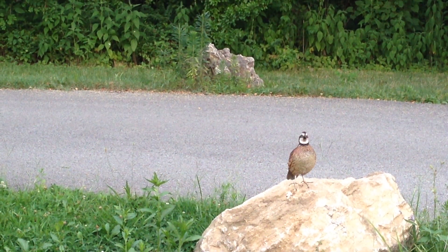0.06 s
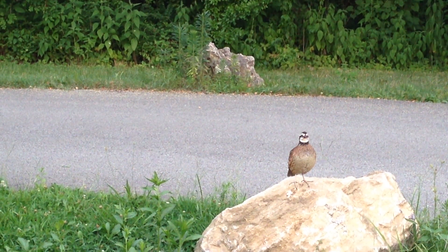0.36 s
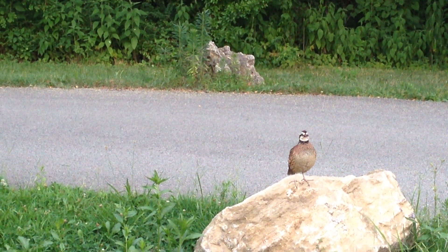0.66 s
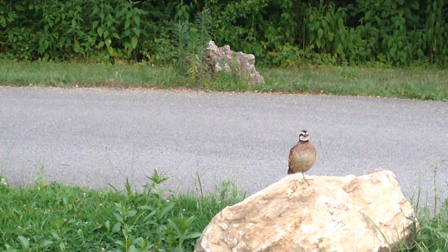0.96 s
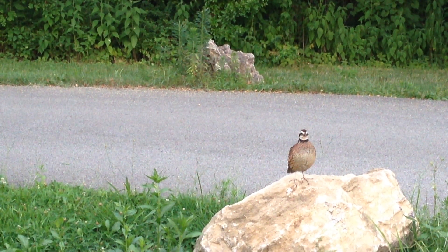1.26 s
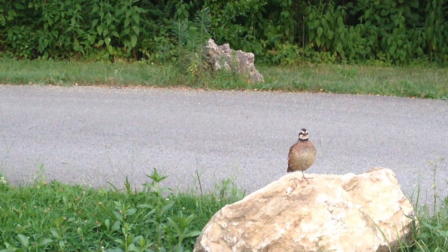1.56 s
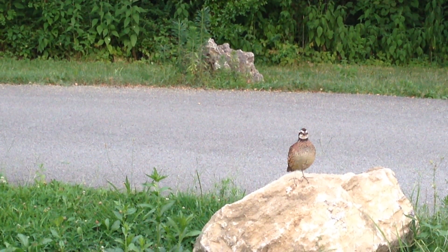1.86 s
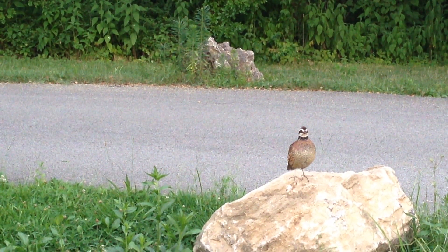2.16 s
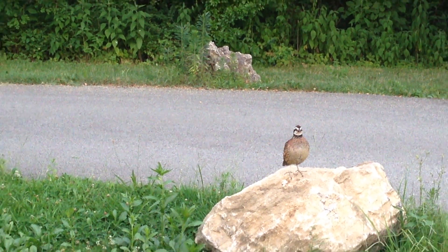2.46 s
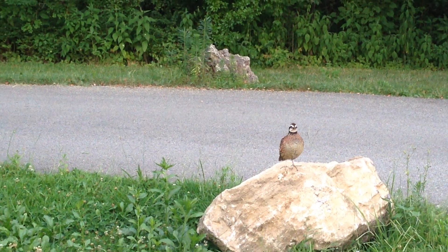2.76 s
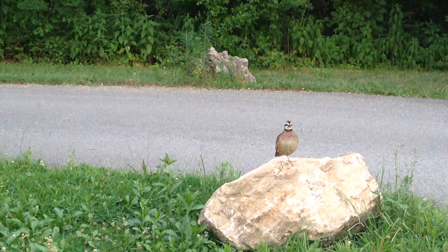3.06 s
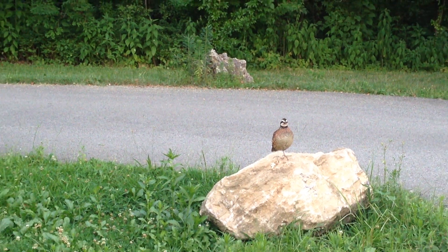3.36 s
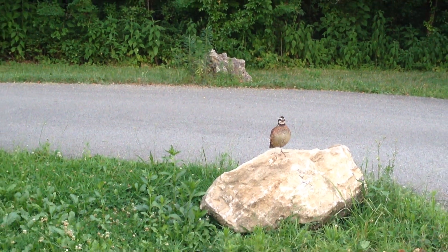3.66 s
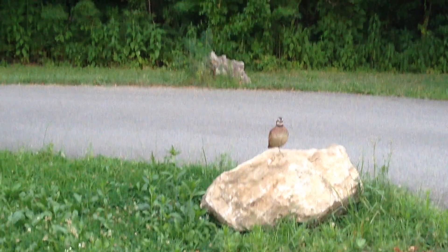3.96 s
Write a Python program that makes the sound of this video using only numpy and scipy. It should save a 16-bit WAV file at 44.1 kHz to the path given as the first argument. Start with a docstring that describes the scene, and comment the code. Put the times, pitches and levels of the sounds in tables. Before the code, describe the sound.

A quail close by gives one loud rising whistle right at the start, buzzing in the middle and cracking into a brief hoarse falling note by 0.2 seconds. Its echo fades through the woods by about 1 second. Faint outdoor air and a barely audible distant insect remain. A small tick comes near 2.9 seconds and a soft low microphone bump near 3.4 seconds.

```python
"""A quail on a rock, close to the microphone, gives one loud rising whistle beside a quiet country road.
A second, slower vibration makes the middle of the whistle buzz; at the top the voice cracks into a
hoarse falling note. Nearby ground and leaves scatter the call, and the wood across the road echoes it.
Around it lie still air and a faint, distant insect; later come a tick and a soft bump on the camera."""
import sys
import numpy as np
from scipy import signal
from scipy.fft import rfft, irfft
from scipy.io import wavfile
from scipy.ndimage import uniform_filter1d

SR = 44100
rng = np.random.default_rng(int(sys.argv[2]) if len(sys.argv) > 2 else 0)


def master_out(mix):
    """Clip the mix to full scale and print it as 16-bit PCM to the path in sys.argv[1]."""
    frames = np.transpose(np.atleast_2d(mix))
    ceiling = np.clip(frames, -1, 1)
    pcm = np.round(ceiling * 32767).astype(np.int16)
    wavfile.write(sys.argv[1], SR, pcm)


N = 176400


def amp(db):
    """Decibels to gain."""
    return 10 ** (np.asarray(db) / 20)


def unit(x):
    """Scales to rms 1."""
    return x / np.sqrt(np.mean(x ** 2) + 1e-20)


def follow(table, t):
    """The columns of a control table at times t."""
    times, *columns = np.transpose(table)
    return [np.interp(t, times, c) for c in columns]


def read(points, hz):
    """Interpolates a table on a log-frequency axis."""
    f, value = np.transpose(points)
    return np.interp(np.log(hz + 1), np.log(f), value)


def coloured(x, points):
    """Filters x by a spectrum table."""
    return irfft(rfft(x) * amp(read(points, np.fft.rfftfreq(len(x), 1 / SR))), len(x))


def noise(colour, size):
    """Noise of rms 1, its spectrum shaped by colour(hz)."""
    return unit(irfft(rfft(rng.standard_normal(size)) * colour(np.fft.rfftfreq(size, 1 / SR)), size))


def wander(rate_hz, size):
    """Random drift, mostly slower than rate_hz."""
    return noise(lambda f: 1 / (1 + (f / rate_hz) ** 4), size)


def gate(t, start, end, fade):
    """Opens at start and closes at end, with smooth edges."""
    return np.sin(np.pi / 2 * np.clip(np.minimum(t - start, end - t) / fade, 0, 1)) ** 2


# Still air at the roadside, with microphone hiss. Each row: frequency in Hz, relative level in dB.
AIR_SPECTRUM = [(12, -54.5), (20, -24.5), (39, -8), (59, -2.5), (112, -0.5), (139, -5), (184, 0), (243, -6),
                (279, -11.5), (485, -14.5), (589, -15.5), (736, -16.5), (1430, -24), (5270, -20.5),
                (6400, -20.5), (7150, -23), (15100, -24)]


def air(level_db=-64, patchy_db=.9):
    """Low outdoor rumble and smooth hiss, slightly patchy in time and frequency."""
    hz, _, bands = signal.stft(rng.standard_normal(N), SR, nperseg=4096, noverlap=3072)
    patches = unit(uniform_filter1d(uniform_filter1d(rng.standard_normal(bands.shape), 12, 0), 5, 1))
    bands = bands * amp(read(AIR_SPECTRUM, hz)[:, None] + patchy_db * patches)
    return amp(level_db) * unit(signal.istft(bands, SR, nperseg=4096, noverlap=3072)[1][:N])


# An insect far from the microphone. Each row: start in seconds, length in seconds, level in dB.
INSECT_PHRASES = [(0.302, 0.41, -84), (1.2, .5, -79.5), (2.33, .52, -77), (3.3, .55, -78.5)]


def insect(t, centre_hz=6330, half_width_hz=220, fade_s=.092):
    """A narrow, far-off sizzle in slow phrases."""
    sizzle = noise(lambda f: 1 / (1 + ((f - centre_hz) / half_width_hz) ** 2), N)
    return sizzle * sum(amp(db) * gate(t, s, s + length, fade_s) for s, length, db in INSECT_PHRASES)


# A double tick on the camera body, right at the microphone. Each row: delay in seconds, strength in dB.
CAMERA_TICKS = [(0, -35.5), (.00172, -35)]


def camera_tick(t, start_s=2.862):
    """The camera body rings and dies at once, twice over, with a bright snap on the first tick."""
    def ring(onset_s, db, hz, decay_s):
        age = np.maximum(t - onset_s, 0)
        return amp(db) * np.exp(-age / decay_s) * np.sin(2 * np.pi * hz * age)
    ticks = sum(ring(start_s + delay, db, hz=720, decay_s=.0004) for delay, db in CAMERA_TICKS)
    snap = ring(start_s, db=-44, hz=3400, decay_s=.00026)
    return signal.sosfilt(signal.butter(2, 240, "highpass", fs=SR, output="sos"), ticks + snap)


def camera_bump(t, peak_s=3.423, hz=85.1, width_s=.009, peak_db=-50.5):
    """A soft bump on the camera reaches the microphone as one low pulse."""
    offset = t - peak_s
    return amp(peak_db) * np.exp(-(offset / width_s) ** 2) * np.cos(2 * np.pi * hz * offset)


def echo(x, t60, colour, delay_s, build_s):
    """Scattered sound: a tail that builds up, each band dying at its own speed."""
    hz, t, bands = signal.stft(rng.standard_normal(2 * SR), SR, nperseg=512)
    decay = amp(read(colour, hz)[:, None] - 60 * t / read(t60, hz)[:, None])
    bands = bands * decay * (1 - np.exp(-t / build_s))
    tail = np.r_[np.zeros(int(delay_s * SR)), signal.istft(bands, SR, nperseg=512)[1]]
    f = np.fft.rfftfreq(len(tail), 1 / SR)
    voice_band = (f > 1600) & (f < 2700)
    voice_gain = np.sqrt(np.mean(abs(rfft(tail)[voice_band]) ** 2))
    return signal.fftconvolve(x, tail / voice_gain)[:N]


# How long the place rings: close by, at the wood's edge across the road, and deeper in the wood.
# Each row: frequency in Hz, time to fall 60 dB in seconds.
NEAR_DECAY = [(500, 0.05), (1200, 0.38), (2200, 0.2), (4000, 0.36), (7000, 0.35), (14000, 0.2)]
WOOD_EDGE_DECAY = [(500, 0.07), (2000, 0.31), (8000, 0.55)]
DEEP_WOOD_DECAY = [(500, .6), (1200, 0.851), (1720, 1.7), (2100, 1.1), (2500, 1.2), (3200, .65), (7000, .5),
                   (14000, .3)]
# The same three echoes' colour at the microphone. Each row: frequency in Hz, relative gain in dB.
NEAR_SPECTRUM = [(500, -10), (1200, -5.5), (1800, 0), (2100, -3), (2600, 2), (3300, 0), (4000, -3.5),
                 (7000, -3), (14000, -6.5)]
WOOD_EDGE_SPECTRUM = [(500, -12), (1300, -6), (1780, 3), (2100, -5), (2550, 5.5), (2900, -10),
                      (7000, -12.5), (14000, -20)]
DEEP_WOOD_SPECTRUM = [(500, -12), (1350, -11), (1680, 8), (1850, -0.5), (2080, -8), (2520, 6), (2850, -11),
                      (4000, -8), (7000, -9.5), (14000, -15.5)]


def surroundings(call):
    """Ground and leaves nearby answer first; then the wood's edge slaps back and the wood rings on."""
    near = amp(-22) * echo(call, NEAR_DECAY, NEAR_SPECTRUM, delay_s=.006, build_s=.02)
    slap = amp(-25) * echo(call, WOOD_EDGE_DECAY, WOOD_EDGE_SPECTRUM, delay_s=.098, build_s=.006)
    far = amp(-30.5) * echo(call, DEEP_WOOD_DECAY, DEEP_WOOD_SPECTRUM, delay_s=.1, build_s=.025)
    return near + slap + far


# The break in the bird's voice, from close by. Each row: frequency in Hz, relative level in dB.
CRACK_SPECTRUM = [(700, -70), (1400, -26), (2200, -6), (3000, 0), (3700, -13), (5000, -16), (7000, -15),
                  (10000, -21), (14000, -29)]


def voice_crack(t, peak_s=.14, width_s=.0024, level_db=-28):
    """The voice breaks at the top of the whistle in a brief burst of noise."""
    burst = noise(lambda f: amp(read(CRACK_SPECTRUM, f)), len(t))
    return burst * amp(level_db) * np.exp(-((t - peak_s) / width_s) ** 2)


# The note after the break. Each row: time in seconds, pitch in Hz, level in dB before colouring.
FALL_CONTOUR = [(.149, 1450, -44), (.154, 1405, -20), (.16, 1299, -26.5), (.167, 1123, -27),
                (.176, 985, -25), (.186, 860, -33.5), (.194, 730, -36), (.203, 670, -43), (.215, 640, -54)]
# Its colour at the microphone: throat resonances with dips from the ground reflection.
# Each row: frequency in Hz, gain in dB.
FALL_COLOUR = [(300, -75), (540, -42), (660, -9), (900, -9), (1100, -9), (1350, -2.5), (1750, -8.5),
               (2200, 3.5), (2600, -4.5), (2950, 3), (3200, -0.5), (3450, -12), (3950, -11.5),
               (5100, -13.5), (5600, -28), (6300, -23.5), (7800, -24), (10300, -30), (11500, -39),
               (15000, -43)]


def falling_note(t, jitter=.033, shimmer=.55, hoarse_db=-5, hoarse_low_hz=1400):
    """The voice drops about an octave: a firm fundamental, ragged harmonics and hoarse noise."""
    hz, level_db = follow(FALL_CONTOUR, t)
    rough_phase = 2 * np.pi * np.cumsum(hz * (1 + jitter * wander(600, len(t)))) / SR
    voiced = np.cos(2 * np.pi * np.cumsum(hz) / SR)
    for k in range(2, 9):
        ragged = 1 + shimmer * (wander(220, len(t)) + 1j * wander(220, len(t)))
        voiced += (ragged * np.exp(1j * k * rough_phase)).real / np.sqrt(1 + 2 * shimmer ** 2)
    # The hoarse noise lies mostly above the fundamental.
    hoarse = noise(lambda f: amp(read(FALL_COLOUR, f)) / (1 + (hoarse_low_hz / (f + 1)) ** 6), len(t))
    level = amp(level_db) * gate(t, FALL_CONTOUR[0][0], FALL_CONTOUR[-1][0], fade=.004)
    return np.sqrt(2) * coloured(level * voiced, FALL_COLOUR) + level * amp(hoarse_db) * hoarse


# The quail on its rock, close to the microphone. Each row: time in seconds, pitch in Hz, level in dB.
WHISTLE_CONTOUR = [(0, 1241, -30.5), (.013, 1432, -18.5), (.02, 1540, -24), (.026, 1577, -33),
                   (.042, 1630, -29.5), (.06, 1700, -27.5), (.075, 1749, -23.5), (.09, 1793, -17),
                   (.105, 1882, -12.5), (.114, 2020, -7.5), (.119, 2142, -14), (.124, 2249, -10),
                   (.128, 2337, -18), (.135, 2470, -20.5), (.142, 2536, -17), (.149, 2513, -27.5),
                   (.154, 2480, -40)]
# Pressure on the voice. Each row: time in seconds, overtone drive in dB, buzz depth from 0 to 1,
# rasp level in dB.
VOICE_STRAIN = [(0, -66, 0, -80.5), (.018, -45, 0, -70), (.038, -43, .06, -57), (.049, -42, .85, -41),
                (.075, -39, .8, -36.5), (.095, -41, .3, -34.5), (.105, -42, .07, -33),
                (.117, -43, .03, -34), (.13, -42, .17, -44), (.15, -41, .12, -47)]
# Overtones against that drive. Each row: multiple of the pitch, gain in dB at low pitch, then at the top.
OVERTONE_GAINS = [(2, -1.5, 1.5), (3, -20, -5), (4, 0, -4), (5, -8, -11), (6, -18.5, -21), (7, -6, -26.5),
                  (8, -7.5, -26.5)]
# The overtones' colour at the microphone: throat resonances with dips from the ground reflection.
# Each row: frequency in Hz, gain in dB.
OVERTONE_COLOUR = [(2000, -18), (2600, -13), (2900, 2), (3200, 0.5), (3450, -13), (3800, -5.5), (4500, -3),
                   (5000, 0), (5600, -11), (6200, 2.5), (7100, 3), (7700, -4), (9200, -6), (10500, -13),
                   (12500, -10.5), (15000, -16)]
# The whistle's breathy edge. Each row: frequency in Hz, relative level in dB.
RASP_SPECTRUM = [(300, -70), (600, -36), (780, -9), (1200, -3.5), (2300, -6), (2650, -6.5), (3150, 1),
                 (3450, -9), (4000, -7.5), (4800, -15.5), (5500, -16), (6100, 1), (7100, 1), (7700, -10),
                 (9000, -8), (10200, -21), (12000, -15), (14000, -18), (15000, -34)]


def whistle(t, jitter=.007, shimmer=.075, buzz_start_hz=419.7, buzz_sag_hz_per_s=520, buzz_jitter=.055):
    """A rising tone with thin overtones; a slower second vibration adds sidebands and pulses the rasp."""
    hz, level_db = follow(WHISTLE_CONTOUR, t)
    drive_db, depth, rasp_db = follow(VOICE_STRAIN, t)
    phase = 2 * np.pi * np.cumsum(hz * (1 + jitter * (.4 + depth) * wander(500, len(t)))) / SR
    buzz_hz = (buzz_start_hz - buzz_sag_hz_per_s * t) * (1 + buzz_jitter * wander(300, len(t)))
    buzz = 2 * np.pi * np.cumsum(buzz_hz) / SR
    low_hz, top_hz = 1840, 2350
    height = np.clip((hz - low_hz) / (top_hz - low_hz), 0, 1)
    lower_sidebands = 1.2 * np.cos(phase - buzz) + .07 * np.cos(phase - 2 * buzz)
    upper_sideband = -(.4 + .7 * height) * np.sin(phase + buzz)
    tone = amp(level_db) * (np.cos(phase) + depth * (lower_sidebands + upper_sideband))
    tone *= 1 + shimmer * wander(400, len(t))
    overtones = np.zeros(len(t))
    for k, low_db, top_db in OVERTONE_GAINS:
        sidebands = 3 / k * np.cos(k * phase - buzz) + .3 * np.cos(k * phase + buzz)
        gain = amp(drive_db + low_db + height * (top_db - low_db))
        overtones += gain * (np.cos(k * phase) + depth * sidebands)
    breath = rng.standard_normal(len(t)) * (1 + .6 * depth * np.cos(buzz))
    rasp = amp(rasp_db) * unit(coloured(breath, RASP_SPECTRUM))
    sounding = gate(t, 0, WHISTLE_CONTOUR[-1][0], fade=.002)
    voiced = tone * sounding + coloured(overtones * sounding, OVERTONE_COLOUR)
    return np.sqrt(2) * voiced + rasp * sounding


def scene():
    """One microphone by the road: the close call, its echoes and the quiet around it."""
    t = np.arange(N) / SR
    early = t[:SR // 2]
    call = np.pad(whistle(early) + falling_note(early) + voice_crack(early), (0, N - len(early)))
    return (call + surroundings(call) + air() + insect(t) + camera_tick(t) + camera_bump(t))[None]


def record(dry):
    """The recorder cuts the treble above 15.3 kHz."""
    lowpass = signal.firwin(801, 15300, window=("kaiser", 9), fs=SR)
    return signal.oaconvolve(dry, lowpass[None], "same")


dry = scene()
out = record(dry)
master_out(out)
```